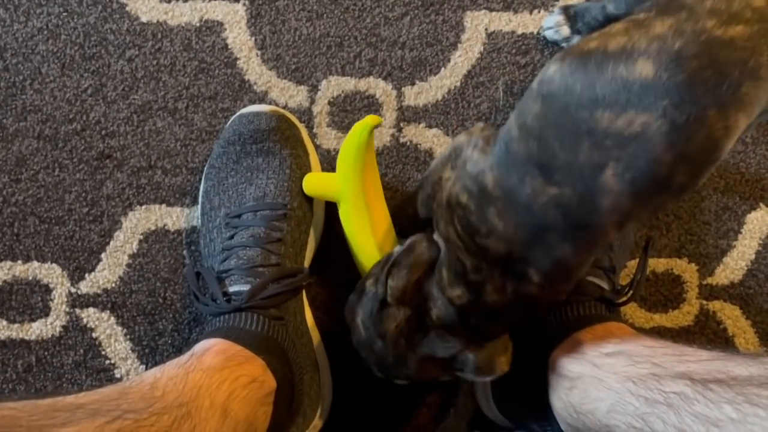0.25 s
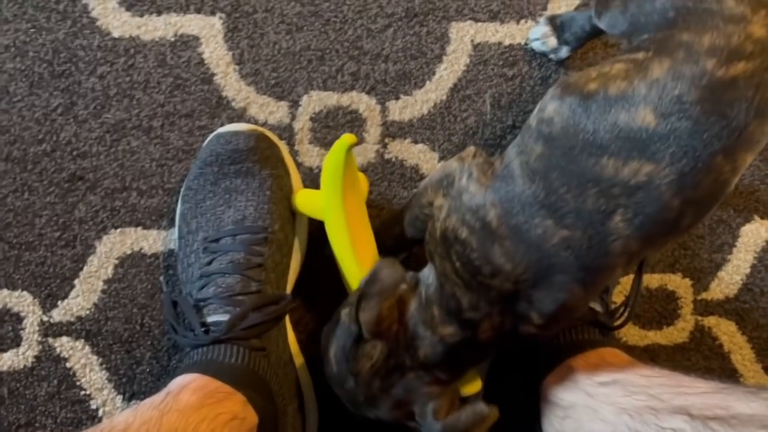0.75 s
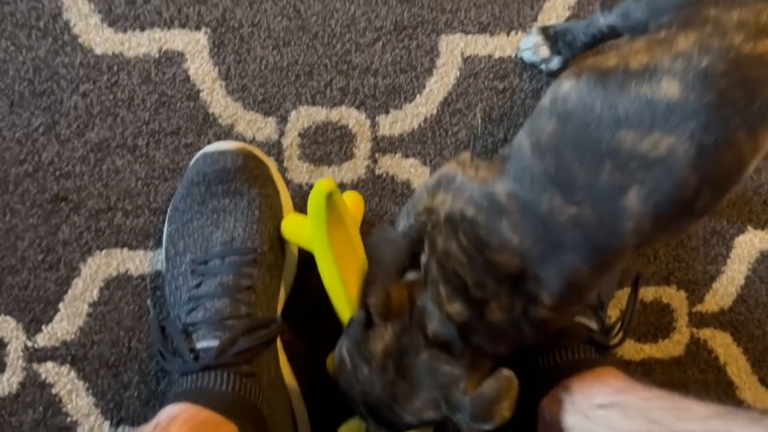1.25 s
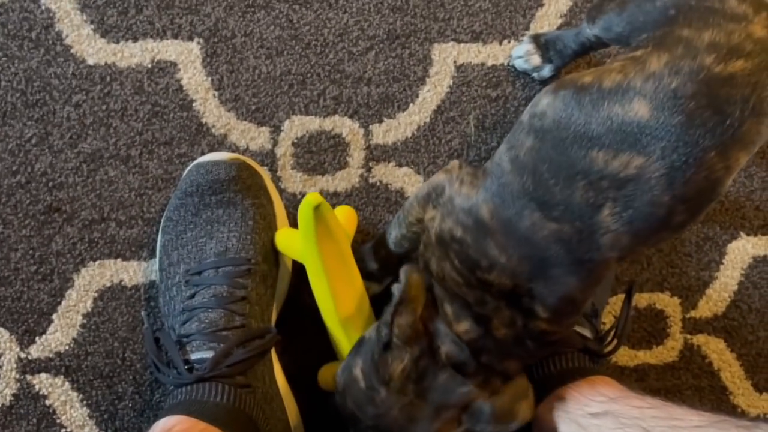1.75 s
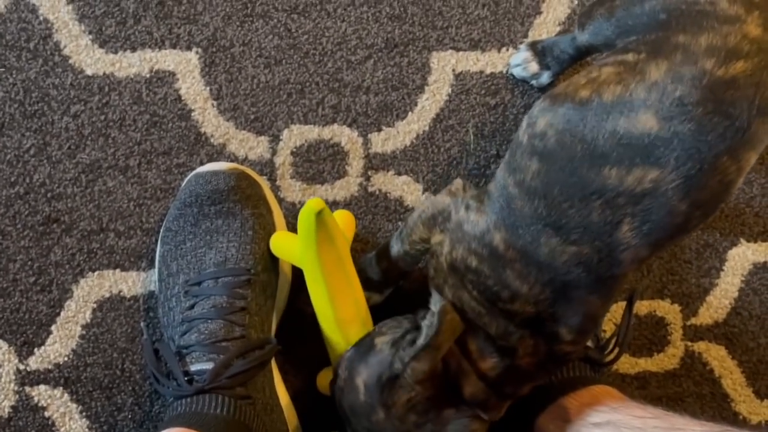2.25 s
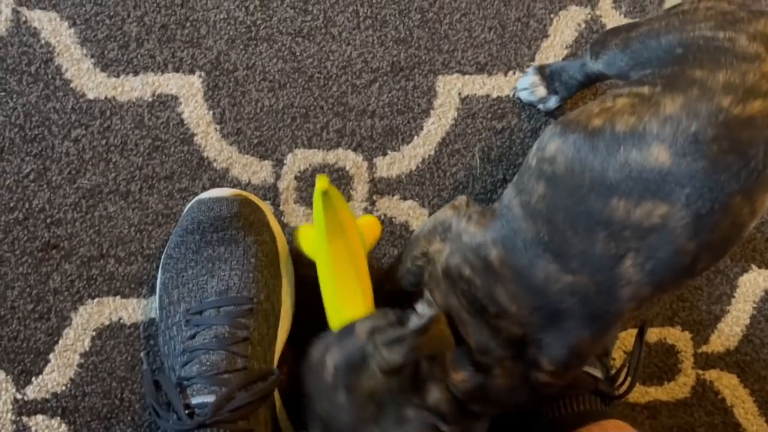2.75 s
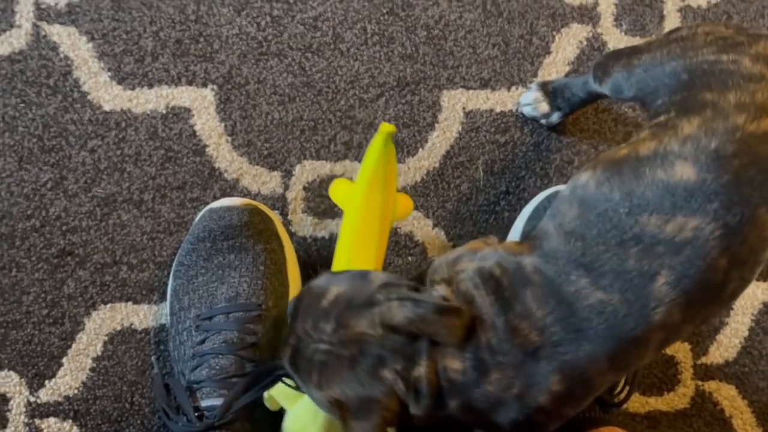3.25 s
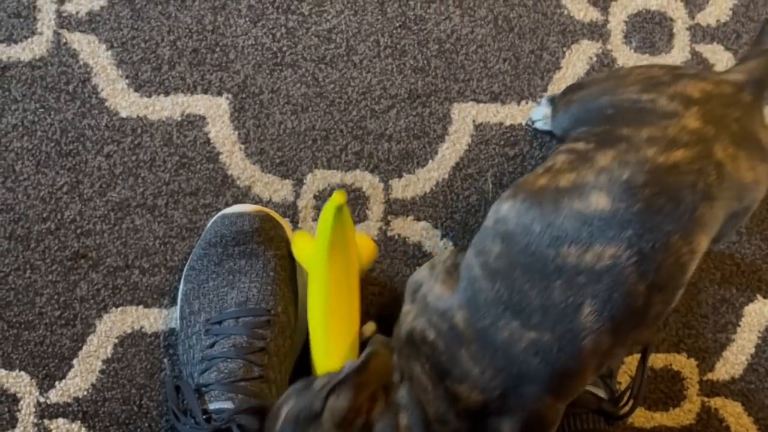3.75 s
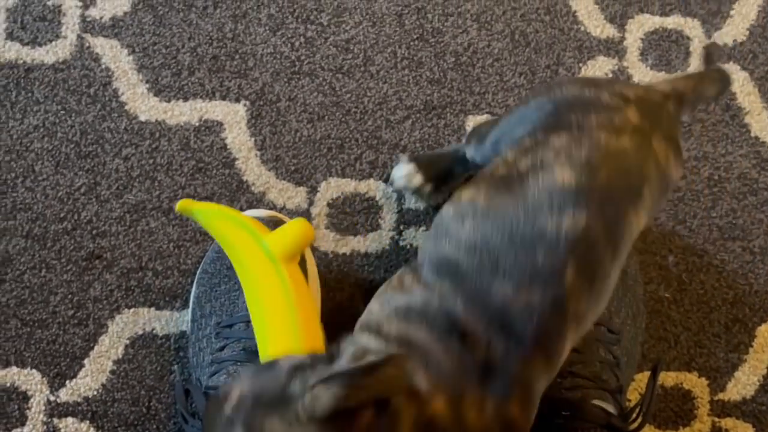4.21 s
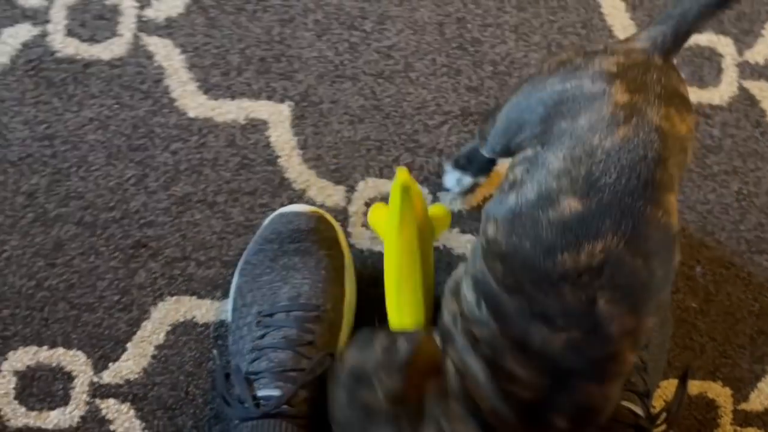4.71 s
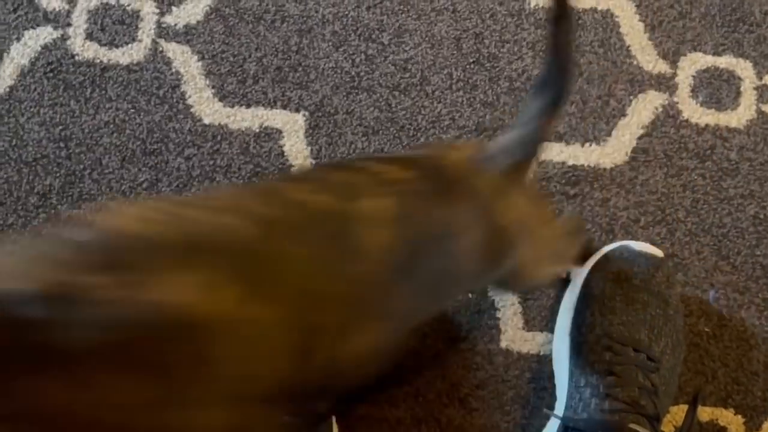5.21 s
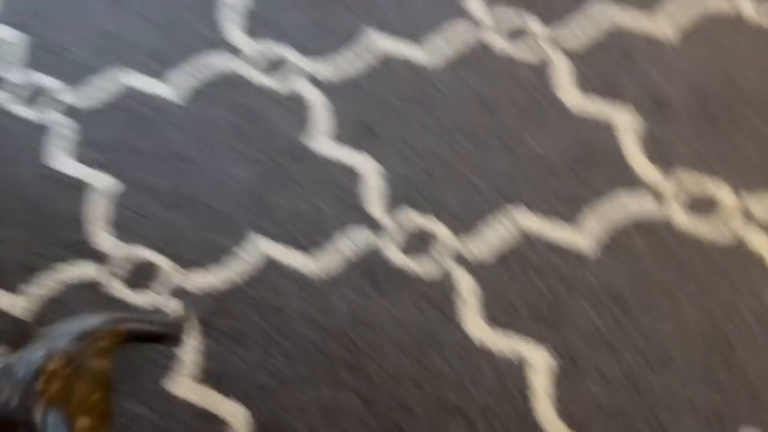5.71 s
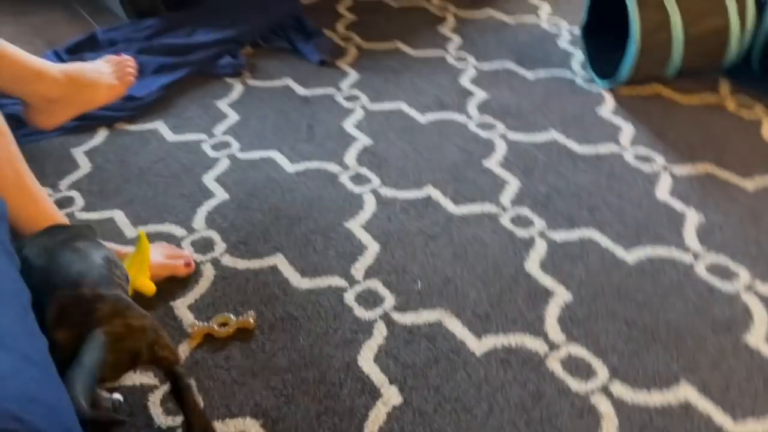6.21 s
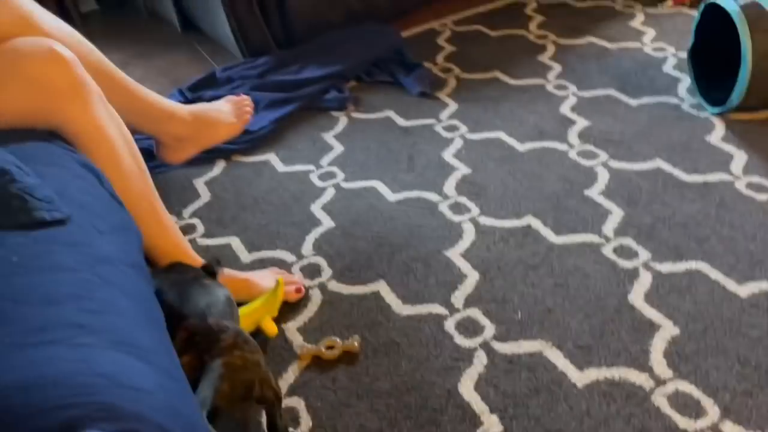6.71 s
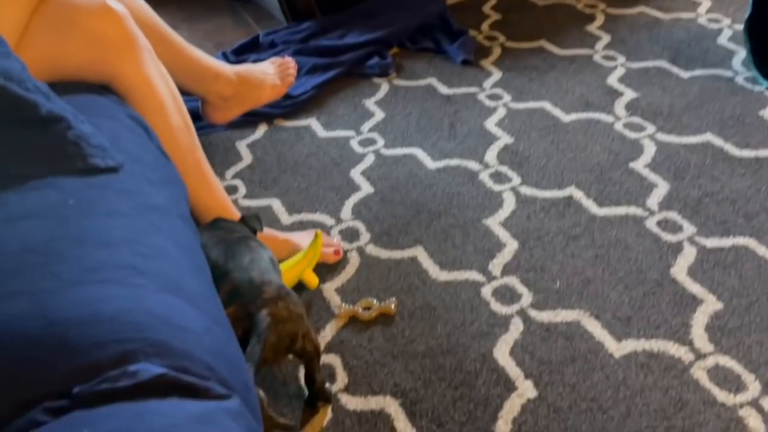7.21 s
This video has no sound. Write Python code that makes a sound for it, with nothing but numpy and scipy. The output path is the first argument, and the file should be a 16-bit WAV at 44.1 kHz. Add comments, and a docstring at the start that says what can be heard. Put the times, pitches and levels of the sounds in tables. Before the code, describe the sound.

Close, lively indoor sound with a carpeted room's short echo and faint low handling rumble. After a tiny faint peep, a loud buzzy squeak runs from 0.17 to 0.59 seconds, climbing then sagging. A higher, cleaner whistle answers from 0.65 to 1.12. Soft thumps fall near 1.1, then a near-quiet gap. At 2.2 comes a quick rising buzz, a short high peep at 2.5 and a tiny blip at 2.7. A bright, raspy high squeak at 3.3 is followed by a brief lower one at 3.5. Around 4.15 to 4.55, knocks and clicks cluster around a sharp high peep, with fur rustle. A wavering buzzy squeak fills 4.7 to 4.95. A low thud at 5.2 and rustling lead to a bump and click near 5.97, around a faint peep. Farther off, softer squeaks sound at 6.4, 6.95 to 7.2, rough and rising, and 7.4, with light bumps.

```python
"""Squeaky toy chewed by a puppy

A puppy chews a rubber squeaky toy on a carpet, close below a hand-held camera, then carries it off.
Each bite drives air through a buzzy reed, a harmonic stack whose pitch and level follow the pressure.
Each release sucks the air back in on a higher, purer note. Bumps are sinking sines with dull noise, taps
are short noise bursts, and fur, cloth and the hand's rumble are coloured noise of uneven level."""
import sys
import numpy as np
from scipy import signal
from scipy.fft import rfft, irfft, next_fast_len
from scipy.io import wavfile
from scipy.ndimage import uniform_filter1d, minimum_filter1d, map_coordinates

SR = 44100
rng = np.random.default_rng(int(sys.argv[2]) if len(sys.argv) > 2 else 0)


def to_wav(s):
    """Save 16-bit WAV."""
    ch = np.atleast_2d(s).T  # columns
    pcm = np.round(np.clip(ch, -1, 1) * 32767)  # PCM
    wavfile.write(sys.argv[1], SR, pcm.astype(np.int16))


N = 328986  # length [samples]

# rumble spectrum of the hand on the camera: (frequency [Hz], level [dB])
RUMBLE_COLOUR = [(20, -36), (35, -19), (55, 3), (75, 3.5), (100, -5.5), (150, -6), (250, -9.5), (450, -17),
                 (900, -23), (2000, -65)]
# spectrum of rubbed fur: (frequency [Hz], level [dB])
FUR_COLOUR = [(150, -20.5), (300, -13), (600, -3), (1300, -5.5), (2500, -11), (4500, -17.5), (7000, -38),
              (12000, -59)]
# spectrum of rubbed cloth: (frequency [Hz], level [dB])
CLOTH_COLOUR = [(2000, -8), (4500, -5.5), (8500, -1.5), (9500, -2.5), (10200, -14.5), (11300, 0.5),
                (12500, -23), (15000, -44.5)]
# rustle as the puppy gets restless, then the camera swings after it: (time [s], level [dB])
BUSTLE_LEVEL = [(0, -70.5), (3.7, -80.5), (4.05, -56.5), (4.6, -58.5), (5.4, -58.5), (5.75, -52.5),
                (6.35, -54.5), (6.62, -63), (6.8, -57), (7.1, -66)]
# single strokes, swelling and fading: (middle [s], half length [s], fur level [dB], cloth level [dB])
RUB_STROKES = [(1.47, 0.08, -58, -84.5), (2.148, 0.051, -62.5, -84.5), (2.939, .06, -60.5, -77.5),
               (3.835, 0.094, -51, -61.5), (4.478, 0.024, -41.5, -52), (5.259, 0.046, -57, -44.5),
               (5.984, 0.031, -45.5, -54)]
# rumble level at a rustle of 0 dB [dB], and its gain per dB of rustle [dB/dB]
RUMBLE_DB, RUMBLE_FOLLOWS = -29, 0.33
FUR_DB, CLOTH_DB = -2, -2  # relative to the rustle [dB]

# decay of the room: (frequency [Hz], 60 dB decay time [s])
ROOM_DECAY = [(150, 0.39), (1000, 0.43), (4000, 0.41), (8000, 0.12), (14000, 0.05)]
# where the toy is: (time [s], left over right [dB], room send [dB])
TOY_PLACE = [(.05, -3, -7.5), (.14, -4, -25), (2.7, -4, -26.5), (3.35, 4.5, -21), (3.55, -6, -24.5),
             (4.35, -1, -24.5), (4.9, -5, -23), (5.9, -0.5, -11.5), (7.4, 3.5, -9.5)]
# phase of left against right, set by stereo processing: (frequency [Hz], phase [rad])
STEREO_PHASE = [(300, 0.2), (1000, 0.7), (2000, 0.2), (2900, 1.25), (4500, 1.28), (6000, 1.35),
                (7500, 1.82), (8800, -7), (10200, -9.5), (13000, -0.5)]
# how far the left-right lean acts: (frequency [Hz], share of the lean [0-1])
SHADE_SHARE = [(2000, 0.98), (2800, 0), (4500, 0.38), (6000, 0)]

# sharp taps of teeth, claws and hard rubber: (time [s], relative knock level [dB], relative click level [dB])
TAP_EVENTS = [(1.454, -37.5, -75), (1.805, -34.5, -80), (4.153, -30.5, -48.5), (4.19, -22.5, -62.5),
              (4.259, -24, -50), (4.269, -7.5, -33), (4.456, -23.5, -45.5), (4.483, -24, -39),
              (4.494, -25.5, -28.5), (4.537, -26, -59), (5.536, -30.5, -50), (5.705, -24.5, -66),
              (5.979, -27.5, -19)]
# spectrum of a knock: (frequency [Hz], level [dB])
KNOCK_COLOUR = [(200, 4.5), (600, -7), (1000, 4), (1700, -6.5), (3000, -22.5), (5000, -30), (10000, -54)]
# spectrum of a click: (frequency [Hz], level [dB])
CLICK_COLOUR = [(2000, 11), (5000, -3.5), (9000, 3.5), (12000, -5), (14000, -47.5)]
KNOCK_T60_S = .02  # rubber and carpet stop a knock quickly
# paws and toy on floor and shoes:
# (time [s], relative thud level [dB], thud reference pitch [Hz], relative scuff level [dB])
BUMP_EVENTS = [(.61, -38, 260, -46), (1.069, -21.5, 153.5, -31.5), (1.09, -27.5, 200, -47),
               (1.451, -38, 70.7, -37.5), (1.806, -40, 74, -43.5), (2.086, -42, 109, -43),
               (2.574, -33.5, 108, -37), (2.62, -34, 207, -41.5), (3.368, -22.5, 103.7, -32),
               (3.443, -44, 76, -28), (3.788, -30, 208, -45), (3.841, -28, 193, -40),
               (3.952, -30, 210, -37.5), (4.152, -17.5, 176, -30), (4.191, -19.5, 193, -47),
               (4.27, -14.5, 270, -27.5), (4.402, -19, 70.3, -49), (4.535, -36, 170, -32.5),
               (4.624, -40, 276, -37), (4.656, -49, 202, -35), (5.025, -24, 153, -68),
               (5.213, -13, 76.5, -38), (5.465, -40.5, 90.7, -42.5), (5.538, -37, 72.4, -51),
               (5.709, -31, 262, -45.5), (5.793, -35, 131, -38), (5.973, -18, 164, -21),
               (6.184, -29.5, 165, -80), (7.135, -21, 212, -32.5), (7.216, -26.5, 257, -40.5)]

# bites squeeze air out; the grip of the mouth lifts or damps one band:
# (start [s], end [s], held pitch [Hz], final sag [s], relative level [dB], low overtones [dB],
#  high overtones [dB], rasp per unit strain, grip band [Hz], grip gain [dB])
BITE_EVENTS = [(0.165, 0.588, 882.8, 0.13, -0.5, 0.5, -4.5, .2, 3460, 5),
               (2.222, 2.455, 880, .09, -2, 0.5, 2, 0.4, 2450, -13),
               (2.666, 2.717, 846, .037, 0, -3, -1, .1, 4240, 1),
               (3.507, 3.579, 874, .063, 0, -7, 1.5, 0.52, 1730, -5),
               (4.711, 4.958, 903, .046, -3, 1, 7, .3, 2967, 7),
               (6.938, 7.186, 877.8, 0.053, -13.5, -7.5, -1, 1.05, 1764, -10.5)]
# releases suck air back in:
# (start [s], end [s], held pitch [Hz], final sag [s], relative level [dB], low overtones [dB],
#  high overtones [dB], rasp per unit strain, grip band [Hz], grip gain [dB])
RELEASE_EVENTS = [(0, 0.039, 1214, 0.027, -23.5, -1.5, -9, 0, 3600, -1),
                  (.65, 1.122, 1282, .13, 0, 0.5, -2, 0.69, 5200, -3.5),
                  (2.1, 2.13, 1126, .01, -29, -11, -7, 0, 2240, -2),
                  (2.514, 2.594, 1264, .065, 0.5, 2, 1, .1, 3800, 4.5),
                  (3.307, 3.465, 1293, .045, -2.5, 7.5, 7, 1, 5410, 9),
                  (4.295, 4.4, 1297, .085, 3.5, 2.5, 4.5, .2, 2490, 13),
                  (5.867, 5.923, 1276, .025, -19.5, 13.5, 13.5, 1, 2710, 4),
                  (6.392, 6.497, 1261, 0.087, -16, -3.5, -6, .1, 4990, 11),
                  (7.357, 7.467, 1243, 0.12, -13.5, -2.5, -10, 0.013, 2430, -6.5)]
# the jaws shift in mid-squeak and the pressure climbs or eases:
# (middle [s], rise time [s], pitch change [Hz])
JAW_PUSHES = [(.318, .285, 232.5), (0.944, .04, 22.5), (1.0, 0.029, -13), (2.336, 0.058, 137),
              (3.359, 0.036, 20.5), (3.398, .03, -45), (4.756, 0.059, 162), (4.808, 0.045, -33.5),
              (4.86, .05, 22), (7.015, 0.04, -37.5), (7.083, .062, 177)]
# resonances of the reed and the toy's mouth, air going out: (frequency [Hz], gain [dB])
BITE_RESONANCE = [(1500, 6.5), (2100, 0), (2600, -9.5), (3200, 0), (3800, -4.5), (4400, -3.5), (5300, -4),
                  (6300, -7.5), (7200, -16), (8300, -17), (9400, -23), (10100, -33), (11200, -23.5),
                  (13000, -42)]
# resonances of the reed and the toy's mouth, air going in: (frequency [Hz], gain [dB])
RELEASE_RESONANCE = [(2200, 2), (2600, 2.5), (3500, -3.5), (3900, 3.5), (4800, -8), (5250, 0),
                     (5900, -20.5), (6500, -7), (7800, -4.5), (8600, -4), (9100, -29.5), (10200, -35),
                     (11600, -16), (13500, -39)]
# level against pitch, air going out; the columns for overtones are relative to the fundamental:
# (pitch [Hz], fundamental [dB], low overtones [dB], high overtones [dB])
BITE_LEVELS = [(660, -24, -7.5, -24), (772, -24.5, 7, -7), (913, -15, -0.5, -10.5), (944, -18, -2.5, -8),
               (1030, -11.5, -4, -14.5)]
# level against pitch, air going in; the columns for overtones are relative to the fundamental:
# (pitch [Hz], fundamental [dB], low overtones [dB], high overtones [dB])
RELEASE_LEVELS = [(1090, -22.5, -13.5, -17), (1288.6, -16.5, -9.5, -18.5), (1340.6, -11.5, -6.5, -14)]
SCOOP_HZ = 57  # pitch deficit as a squeak starts
STRAIN_HZ = 170  # an upward push of this size counts as full strain
CALM_ROUGHNESS = 0.091  # before a push or the final sag makes the reed rasp
GRIP_OCTAVES = 0.1  # Gaussian half width of the band that the mouth colours
REED_SMOOTHING_S = .015  # span over which the reed's swing averages the pressure
TOP_HZ = 15800  # nothing sounds from here upward


def amp(db):
    """Decibel law: level to amplitude ratio."""
    return 10 ** (np.asarray(db) / 20)


def unit(x):
    """Normalization of x to rms 1."""
    return x / np.sqrt(np.mean(x ** 2) + 1e-20)


def along(points, hz):
    """Interpolation of (frequency, value) points on a logarithmic axis."""
    f, v = np.transpose(points)
    return np.interp(np.log(hz + 1), np.log(f + 1), v)


def curves(rows, t):
    """Linear interpolation of each column after the first (a time or a pitch), read at t."""
    s, *cols = np.transpose(rows)
    return [np.interp(t, s, c) for c in cols]


def wobble(rate, size):
    """Band-limited random fluctuation: a smooth curve through random knots, rate a second."""
    knots = rng.standard_normal(int(size * rate / SR) + 4)
    return map_coordinates(knots, [np.arange(size) * rate / SR])


def filtered(x, response):
    """Linear filtering: the spectrum of x times a response of frequency."""
    n = x.shape[-1]
    m = next_fast_len(n + SR // 8)
    return irfft(rfft(x, m) * response(np.fft.rfftfreq(m, 1 / SR)), m)[..., :n]


def noise(colour, size):
    """Spectral shaping of white noise, at rms 1."""
    return unit(filtered(rng.standard_normal(size), lambda hz: amp(along(colour, hz))))


def add(track, s, sound):
    """Superposition of a sound on a track at s seconds."""
    start = max(round(s * SR), 0)
    part = sound[:N - start]
    track[start:start + len(part)] += part


def wide_noise(colour, side_db):
    """Partial coherence: a common noise plus an independent one of opposite sign in the two channels."""
    side = noise(colour, N) * [[1], [-1]]
    return unit(noise(colour, N) + amp(side_db) * side)


def movement():
    """Friction noise: fur and cloth rub in uneven catches, and the hand rumbles on the camera."""
    t = np.arange(N) / SR
    bustle_db, = curves(BUSTLE_LEVEL, t)
    fur_level, cloth_level = amp(bustle_db + FUR_DB), amp(bustle_db + CLOTH_DB)
    for s, half_s, fur_db, cloth_db in RUB_STROKES:
        stroke = np.exp(-((t - s) / half_s) ** 2)
        fur_level = fur_level + amp(fur_db) * stroke
        cloth_level = cloth_level + amp(cloth_db) * stroke
    tremor_db = 1.5 * wobble(14, N)
    rumble_level = amp(RUMBLE_DB + RUMBLE_FOLLOWS * bustle_db + tremor_db)
    rumble = rumble_level * wide_noise(RUMBLE_COLOUR, side_db=-14)
    fur = fur_level * amp(2.5 * wobble(52, N)) * wide_noise(FUR_COLOUR, side_db=-2.5)
    cloth = cloth_level * amp(2.9 * wobble(130, N)) * wide_noise(CLOTH_COLOUR, side_db=-2)
    return rumble + fur + cloth


def room(x):
    """Reverberation: convolution with decaying noise, different in each channel, shorter in the treble."""
    hz, t, z = signal.stft(rng.standard_normal((2, SR)), SR, nperseg=256)
    decay = amp(-60 * t / along(ROOM_DECAY, hz)[:, None])
    tail = signal.istft(z * decay, SR, nperseg=256)[1]
    # the tail sets in 5 ms after the direct sound
    mid, side = np.pad(tail / np.linalg.norm(tail[0]), ((0, 0), (SR // 200, 0)))
    tails = np.array([mid + 0.18 * side, mid - 1.4 * side])
    return signal.fftconvolve(x[None], tails, axes=1)[:, :N]


def nearby(x, echo_db, longest_s, count):
    """Comb interference: weak, quick reflections from shoes, legs and furniture ripple the overtones."""
    delays = rng.uniform(.001, longest_s, (count, 2, 1))
    strength = [(300, 0.12), (2500, 0.73), (7000, 1.0), (9500, .1)]  # (frequency [Hz], share)

    def response(hz):
        ripple = sum(np.exp(-2j * np.pi * hz * d) for d in delays) / np.sqrt(count)
        return 1 + amp(echo_db) * ripple * along(strength, hz)

    return filtered(x, response)


def taps():
    """Impact of hard bodies: a heavily damped broadband knock with a click on top, and no ring."""
    out, t = np.zeros(N), np.arange(SR // 16) / SR
    for s, knock_db, click_db in TAP_EVENTS:
        knock = noise(KNOCK_COLOUR, len(t)) * (1 - np.exp(-t / 0.00025))
        knock = knock * amp(knock_db - 1.5 - 60 * t / KNOCK_T60_S)
        click = noise(CLICK_COLOUR, len(t)) * amp(click_db + 2 - 60 * t / 0.0085)
        add(out, s, knock + click)
    return out


def bumps():
    """Impact of soft bodies: a damped thud that sinks in pitch as the contact spreads, and a dull scuff."""
    out, t = np.zeros(N), np.arange(SR // 4) / SR
    # (frequency [Hz], level [dB])
    scuff_colour = [(60, 10), (250, 3), (600, -3.5), (1200, -14.0), (3000, -42.5), (8000, -60.0)]
    for s, thud_db, hz, scuff_db in BUMP_EVENTS:
        pitch = hz * (.75 + 0.72 * np.exp(-t / 0.012))
        phase = 2 * np.pi * np.cumsum(pitch) / SR
        thud = np.sin(phase) * (1 - np.exp(-t / 0.0038)) * amp(-60 * t / 0.088)
        scuff = noise(scuff_colour, len(t)) * (1 - np.exp(-t / 0.0013)) * amp(-60 * t / 0.074)
        add(out, s, amp(thud_db - 2.0) * thud + amp(scuff_db + 7) * scuff)
    return out


def airflow(t, start, end, held_hz, sag_s, stall_hz, scoop_s, sag_power):
    """Pressure-controlled pitch: it scoops up, holds, moves with the jaws and sags to the stall.

    Gives (pitch [Hz], strain)."""
    pushed_hz = 0
    for s, rise_s, change_hz in JAW_PUSHES:
        if start < s < end:
            progress = np.clip((t - s) / rise_s + .5, 0, 1)
            pushed_hz = pushed_hz + change_hz * np.sin(np.pi / 2 * progress) ** 2
    pitch = held_hz + pushed_hz - SCOOP_HZ * np.exp(-np.maximum(t - start, 0) / scoop_s)
    sag = np.clip(1 - (end - t) / sag_s, 0, 1) ** sag_power
    strain = np.clip(pushed_hz / STRAIN_HZ, 0, 1) + np.sqrt(sag)
    return pitch + (stall_hz - pitch) * sag, strain


def normalized(gains):
    """Energy sharing: overtone gains scaled to a summed power of 1 at each moment."""
    return gains / np.sqrt(np.sum(gains ** 2, axis=0) + 1e-12)


def squeak(row, response, colour, high_hz, jitter, waver, flutter_db, split_db, air_db, attack_s, **flow):
    """Reed oscillation: a harmonic stack gliding under fixed resonances, as (start [s], sound)."""
    start, end, held_hz, sag_s, level_db, low_gain_db, high_gain_db, rasp, grip_hz, grip_db = row
    t = np.arange(max(start - .015, 0), end + .02, 1 / SR)
    n = len(t)
    pitch, strain = airflow(t, start, end, held_hz, sag_s, **flow)
    levels = np.array(curves(response, pitch))
    db, low_db, high_db = uniform_filter1d(levels, size=round(REED_SMOOTHING_S * SR), axis=1)
    db, low_db, high_db = db + level_db, low_db + low_gain_db, high_db + high_gain_db
    rough = np.clip(CALM_ROUGHNESS + rasp * strain, 0, 1.5)

    # the jaws waver slowly; period jitter blurs the high overtones most
    pitch = pitch * (1 + jitter * rough * wobble(900, n) + waver * wobble(40, n))
    phase = 2 * np.pi * np.cumsum(pitch) / SR
    k = np.arange(2, 16)[:, None]  # harmonic number
    overtone_hz = k * pitch

    # each overtone's level wavers at random, more so when the tone is rough
    flutter = flutter_db * (1.0 + rough) * np.array([wobble(25.5, n) for _ in k])
    grip = grip_db * np.exp(-(np.log2(overtone_hz / grip_hz) / GRIP_OCTAVES) ** 2)
    gains = amp(along(colour, overtone_hz) + grip + flutter)
    # low and high overtones cross over within 400 Hz
    high = np.clip((overtone_hz - high_hz) / 400 + .5, 0, 1)
    gains = amp(low_db) * normalized(gains * (1 - high)) + amp(high_db) * normalized(gains * high)
    # the tube spreads each puff in time: a phase lag that grows with harmonic number
    overtones = np.sum(gains * np.sin(k * phase - k ** 2 / np.sqrt(2)), axis=0)

    # blown hard, the reed swings unevenly on alternate cycles: faint lines halfway between the harmonics
    split = amp(split_db + 6 * wobble(42, n)) * rough
    overtones = overtones * (1 + split * np.sin(phase / 2 + 1.6 * wobble(150, n)))

    # air hisses through the slit once a cycle; colours are (frequency [Hz], level [dB])
    air = noise([(500, -35), (900, -24), (2000, -10.0), (3500, -3.5), (6000, -6), (9000, -10.5),
                 (13000, -30.5)], n)
    air = air * (1 + np.cos(phase)) * rough ** 1.5 * amp(air_db + low_db)
    # the reed catches within milliseconds and stalls a little more slowly
    catch = (1 + np.tanh((t - start) / attack_s)) / 2
    stall = (1 + np.tanh((end - t) / .004)) / 2
    # a short chiff of air comes through around the catch
    chiff = noise([(300, -29.5), (1100, 7), (1700, -7), (5000, -22), (12000, -47.5)], n)
    chiff = chiff * np.exp(-abs(t - start) / .004) * amp(-7.5)
    tone = np.sqrt(2) * (np.sin(phase) + overtones)
    return t[0], amp(db) * (catch * stall * (tone + air) + chiff)


def toy():
    """Direction-dependent reed regime: bites buzz; releases whistle more cleanly."""
    out = np.zeros(N)
    buzzy = dict(jitter=.007, waver=.003, split_db=-21, air_db=-27, flutter_db=2.2, attack_s=.0025)
    clean = dict(jitter=.003, waver=.002, split_db=-60, air_db=-37, flutter_db=3, attack_s=.001)
    for row in BITE_EVENTS:
        add(out, *squeak(row, BITE_LEVELS, BITE_RESONANCE, high_hz=4760,
                         stall_hz=706, scoop_s=.012, sag_power=1.5, **buzzy))
    for row in RELEASE_EVENTS:
        add(out, *squeak(row, RELEASE_LEVELS, RELEASE_RESONANCE, high_hz=5700,
                         stall_hz=1131.6, scoop_s=0.0022, sag_power=2.9, **clean))
    return out


def scene():
    """Direct and reverberant field: the toy shifts, mostly right of centre, and the room share follows it."""
    pan_db, send_db = curves(TOY_PLACE, np.arange(N) / SR)
    squeaks, knocks = toy(), bumps() + taps()
    lean = squeaks * (amp(np.array([pan_db, -pan_db]) / 2) - 1)
    direct = squeaks + filtered(lean, lambda hz: along(SHADE_SHARE, hz))
    # a stronger room send takes power from the direct sound
    direct = direct / np.sqrt(1 + amp(2 * send_db))
    # stereo processing: a frequency-dependent widening by phase
    halves = np.array([[.5], [-.5]])
    direct = filtered(direct, lambda hz: np.exp(1j * along(STEREO_PHASE, hz) * halves))
    direct = nearby(direct, echo_db=-9, longest_s=.014, count=6)
    reverberant = room(squeaks * amp(send_db) + amp(-16.0) * knocks)
    return direct + knocks * amp([[-.5], [.5]]) + reverberant + movement()


def record(dry):
    """Band limitation and gain control: deep bass is shed, a quick limiter holds peaks, the top is cut."""
    low_cut = signal.sosfilt(signal.butter(3, 38, "highpass", fs=SR, output="sos"), dry)
    needed = 1 / np.maximum(np.abs(low_cut).max(axis=0), 1)
    # 10 ms windows let the gain move smoothly around each peak
    gain = uniform_filter1d(minimum_filter1d(needed, size=SR // 100), size=SR // 100)
    treble = [(11500, 1.5), (13500, -9.0)]  # (frequency [Hz], gain [dB])
    return filtered(low_cut * gain, lambda hz: amp(along(treble, hz)) * (hz < TOP_HZ))


dry = scene()
out = record(dry)
to_wav(out)
```